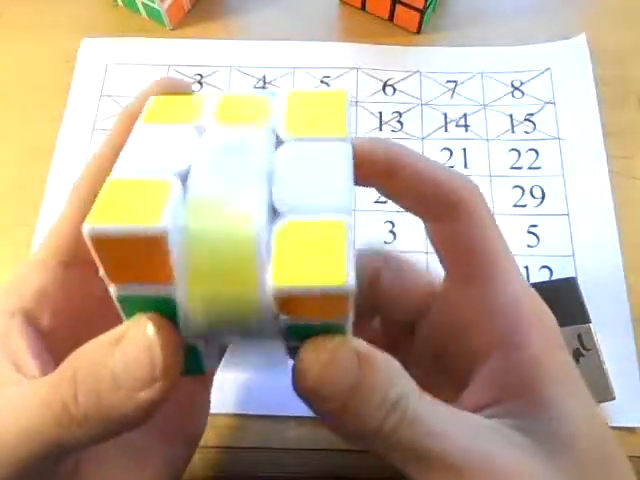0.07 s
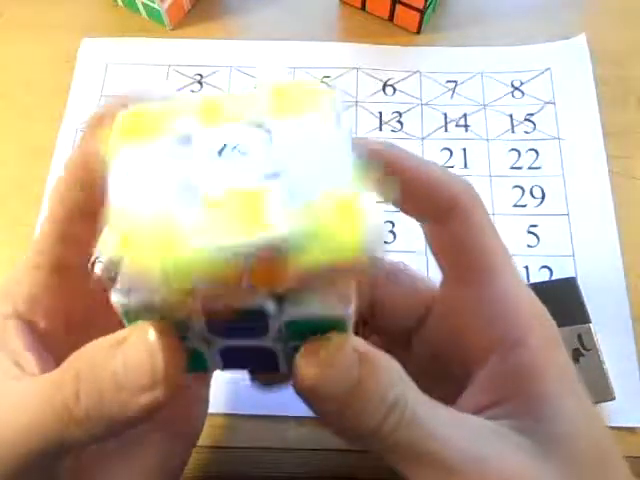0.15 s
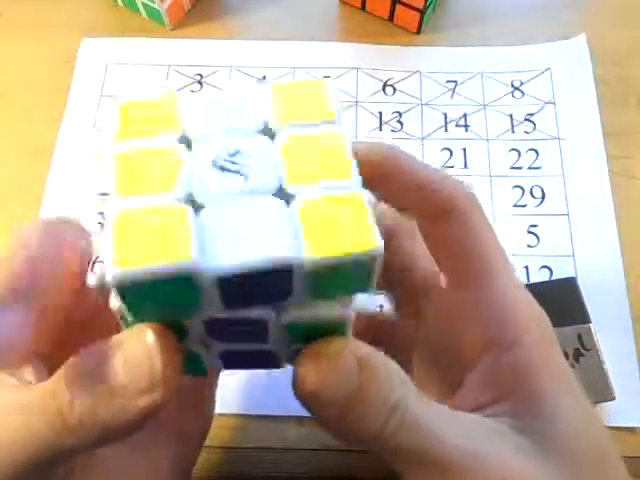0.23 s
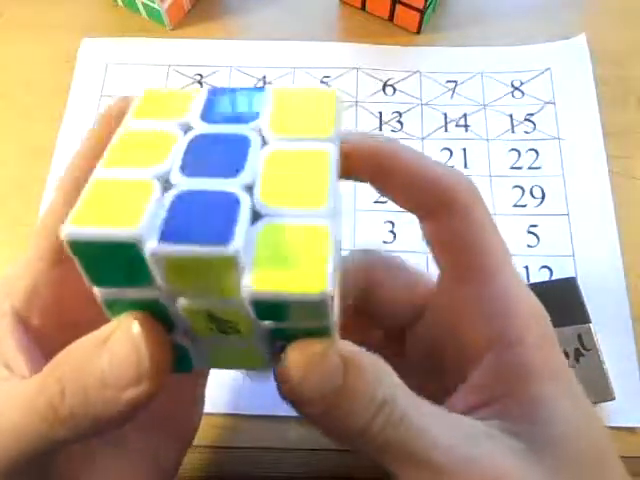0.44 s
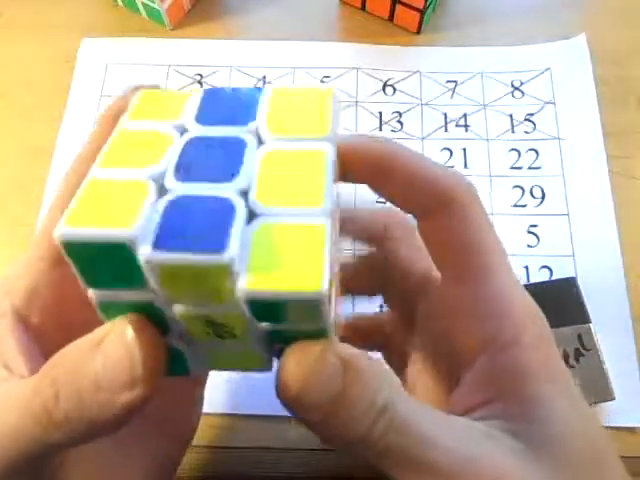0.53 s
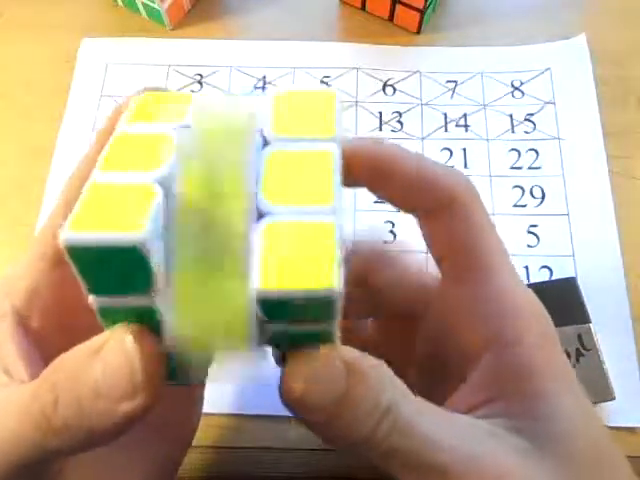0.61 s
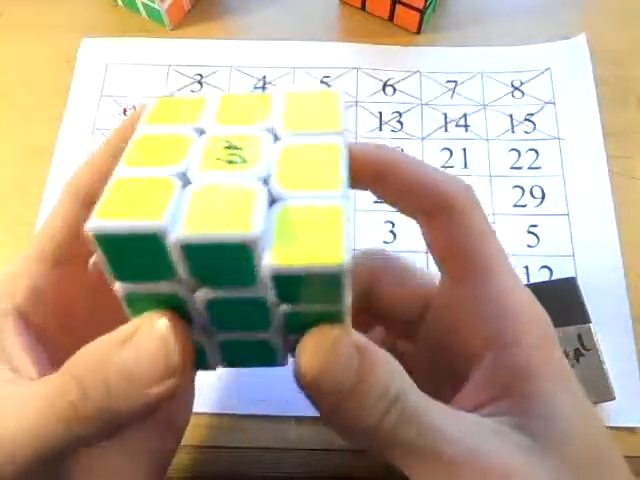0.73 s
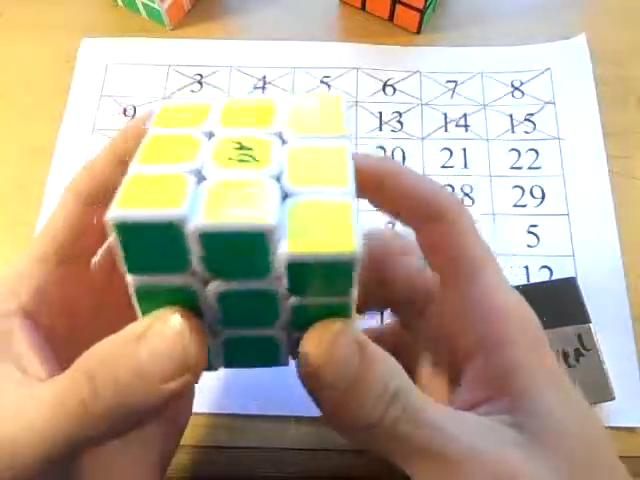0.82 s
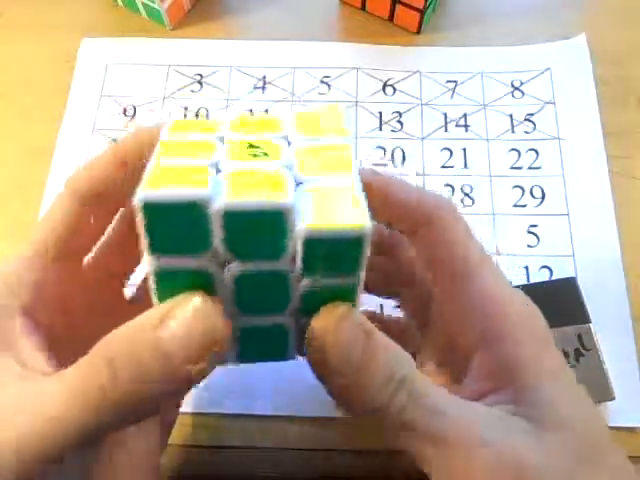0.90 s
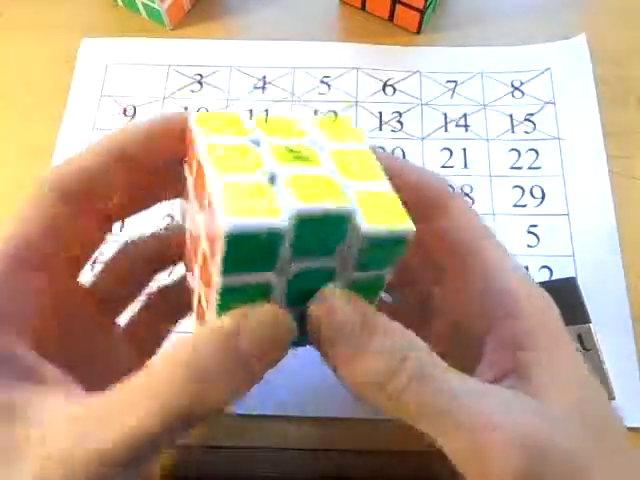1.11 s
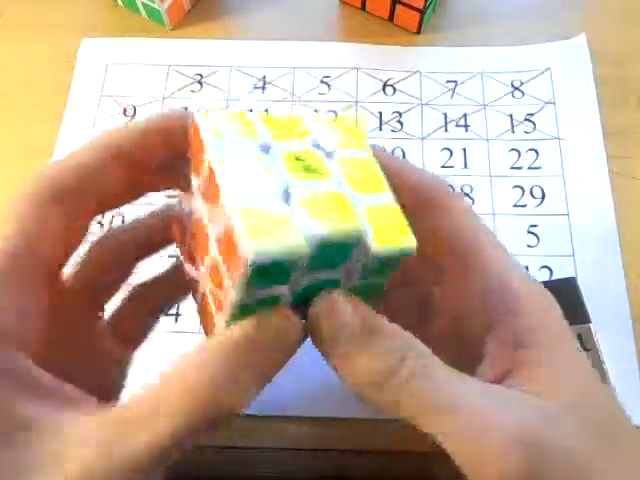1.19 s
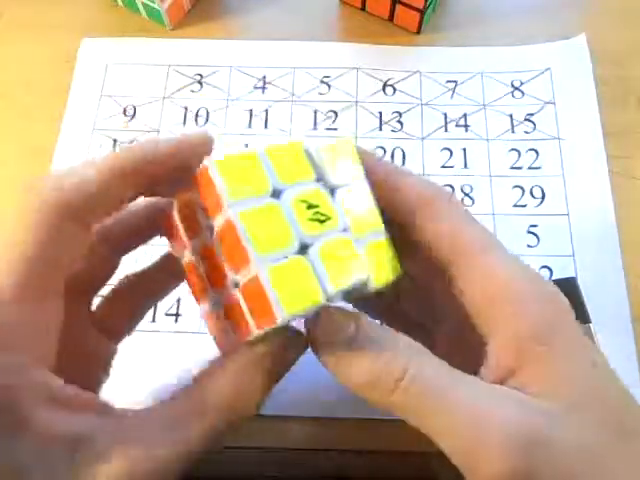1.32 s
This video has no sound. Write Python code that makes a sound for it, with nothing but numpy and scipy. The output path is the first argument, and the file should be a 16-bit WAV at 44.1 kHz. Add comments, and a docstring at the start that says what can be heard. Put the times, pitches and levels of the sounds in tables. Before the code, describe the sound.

Four quick, bright, rattling layer turns of a hollow plastic cube, very close, then small clicks.

```python
"""A plastic puzzle cube is turned fast by hand close to a microphone in a quiet room.
The end of a rattle fades out first, over steady rumble, hiss, a faint hum and two thin whines.
Four layer turns follow: dense contacts ring the hollow pieces and overload the input.
Ticks, and low thumps carried through hands and desk, join the turns; a short room tail follows.
After the last turn, only single ticks and soft thumps remain while the cube is regripped."""
import sys
import numpy as np
from scipy import signal
from scipy.fft import rfft, irfft
from scipy.io import wavfile

SR = 44100
rng = np.random.default_rng(int(sys.argv[2]) if len(sys.argv) > 2 else 0)


def to_wav(sig):
    """Store sig (one row per channel, or 1-D mono) as 16-bit WAV at the path in sys.argv[1].

    Samples outside -1..1 are clipped; the rate is SR.
    """
    pcm = np.clip(np.atleast_2d(sig), -1, 1) * 32767
    pcm = np.round(pcm).astype(np.int16)
    wavfile.write(sys.argv[1], SR, pcm.T)  # frames by channels


N = 59535

# Ways the plastic pieces ring, from low thud to bright top:
# (pitch [Hz], relative level [dB], time to fade by 60 dB [s])
THUD_MODES = [(683, 3.5, 0.0073), (825, -2.5, 0.0078)]
KNOCK_MODES = [(1050, -0.5, 0.0091), (1112, -1.5, 0.017), (1211, -1.5, 0.024), (1312, -7, 0.019),
               (1474, -12, 0.026)]
MIDDLE_MODES = [(2295, -1.1, 0.0052), (2700, -0.72, 0.0051), (3270, -3, 0.0053), (4060, -1.9, 0.0044)]
SHELL_MODES = [(5650, -0.61, 0.0032), (6280, 1.1, 0.0053), (6835, -0.018, 0.0083), (7468, 2.3, 0.0063)]
TOP_MODES = [(8785, -1, 0.0036), (9550, -5.5, 0.0093), (10020, -2.5, 0.0071), (11130, -4, 0.0025),
             (12170, -8, 0.0044), (12900, -9, 0.00087)]


def from_db(db):
    """Turn decibels into a plain multiplier."""
    return 10 ** (np.asarray(db) / 20)


def rms_one(x):
    """Scale a sound so that its average (RMS) level is 1."""
    return x / np.sqrt(np.mean(x ** 2) + 1e-20)


def filtered(x, order, cutoff_hz, kind="low"):
    """Keep the sound below the cutoff, or above it if kind is "high"."""
    return signal.sosfilt(signal.butter(order, cutoff_hz, kind, fs=SR, output="sos"), x)


def shaped_noise(spectrum):
    """Give random noise a chosen strength at each frequency, at RMS level 1."""
    return rms_one(irfft(rfft(rng.standard_normal(N)) * spectrum, N))


def ring(clicks, hz, t60):
    """Each click sets off a fading sine; a unit click starts it at height 1."""
    decay = from_db(-60 / (t60 * SR))  # what is left after one sample
    angle = 2 * np.pi * hz / SR
    feedback = [1, -2 * decay * np.cos(angle), decay * decay]
    return signal.lfilter([0, np.sin(angle)], feedback, clicks + 1e-18)


def strike(clicks, modes, spread_db=3):
    """Every click strikes every mode with a random strength and sign of its own."""
    out = np.zeros(N)
    for hz, db, t60 in modes:
        strength = from_db(db + spread_db * rng.standard_normal(N))
        sign = rng.choice([-1, 1], N)
        out += ring(clicks * strength * sign, hz, t60)
    return out


def turn_gain(column):
    """Follow one level column as pieces slide past each other, fading at both ends of each turn."""
    # The fading end of a rattle, then four turns, each a list of
    # (time [s], rattle level [dB], hollow knock level [dB]), before the low cut in scene()
    turn_levels = [
        [(0, -26, -29), (.014, -37, -39), (.03, -48, -77), (.05, -40, -51)],
        [(.168, -55, -36), (.18, -37, -38.5), (.186, -22, -29.5), (.203, -24.5, -28), (.207, -10.5, -14.5),
         (.214, -14, -18.5), (.23, -9, -16), (.245, -20.5, -24), (.262, -69, -82)],
        [(.285, -56, -41), (.3, -25, -30), (.304, -19, -19.5), (.315, -12, -27.5), (.3235, -22.5, -19),
         (.325, 1.5, -7.5), (.342, -1.5, -21), (.3445, -17, -24.5), (.36, -30, -31)],
        [(.482, -46, -46), (.49, -32, -36), (.499, -17, -27.5), (.503, -15, -15.5), (.518, -4, -14),
         (.528, -13, -30), (.536, -11.5, -20), (.548, -14.5, -34), (.562, -22.5, -33), (.58, -64, -49)],
        [(.726, -47, -42), (.737, -30.5, -24), (.75, -16.5, -25.5), (.764, -10, -16), (.784, -14.5, -26.5),
         (.79, -17.5, -37), (.81, -56, -60)],
    ]
    fade_s = 0.0013
    t = np.arange(N) / SR
    out = np.zeros(N)
    for rows in turn_levels:
        times = np.array(rows)[:, 0]
        levels_db = np.array(rows)[:, column]
        inside_s = np.minimum(t - times[0], times[-1] - t)  # negative outside the turn
        fade = np.clip(1 + inside_s / fade_s, 0, 1)
        out += from_db(np.interp(t, times, levels_db)) * fade
    return out


def rattle():
    """Dense uneven contacts ring the pieces; each also leaves a broad crack."""
    contacts_per_s, contact_spread_db = 4000, 2.5
    middle_db, shell_db, top_db, crack_db = -13.5, -5, -2.5, -24
    thud_db = -14  # compared with the knock
    sizes = from_db(contact_spread_db * np.minimum(rng.exponential(1, N), 4))
    contacts = sizes * (rng.random(N) < contacts_per_s / SR)

    bright = from_db(middle_db) * rms_one(strike(contacts, MIDDLE_MODES))
    bright += from_db(shell_db) * rms_one(strike(contacts, SHELL_MODES))
    bright += from_db(top_db) * rms_one(strike(contacts, TOP_MODES))
    bright += from_db(crack_db) * rms_one(contacts * rng.standard_normal(N))

    hollow = rms_one(strike(contacts, KNOCK_MODES))
    hollow += from_db(thud_db) * rms_one(strike(contacts, THUD_MODES))
    return turn_gain(column=1) * bright + turn_gain(column=2) * hollow


def floor():
    """Room rumble and microphone hiss are shaped noise; hum and whines are very narrow noise."""
    # Tone of the rumble and hiss: (frequency [Hz], relative level per Hz [dB])
    noise_levels = [(15, -23), (25, 0.5), (359, -8), (804, -13.5), (1750, -17), (2120, -16.5), (2850, -19),
                    (6920, -18), (7710, -14.5), (8350, -15), (15500, -25.5)]
    # A low hum and two thin electronic whines:
    # (pitch [Hz], RMS level [dB], distance from the pitch to half height [Hz])
    whine_lines = [(200, -58, 14), (7870, -59, 12), (15735, -61, 12)]
    noise_db = -44.5  # RMS level of rumble and hiss together
    grid = np.fft.rfftfreq(N, 1 / SR) + 1  # 1 Hz added so the logarithm exists at zero
    hz, db = np.transpose(noise_levels)
    spectrum = from_db(np.interp(np.log(grid), np.log(hz), db))
    out = from_db(noise_db) * shaped_noise(spectrum)
    for line_hz, level_db, width_hz in whine_lines:
        peak = 1 / (1 + ((grid - line_hz) / width_hz) ** 2)
        out += from_db(level_db) * shaped_noise(peak)
    return out


def room(x):
    """Desk and walls return a short, slightly dull tail, made of fading noise."""
    t60_s, level_db, cutoff_hz, delay_s = 0.16, -17, 8000, 0.0052
    t = np.arange(SR // 2) / SR
    tail = rng.standard_normal(len(t)) * from_db(-60 * t / t60_s) * (t > delay_s)
    tail = filtered(tail, 2, cutoff_hz)
    tail /= np.sqrt(np.sum(tail ** 2))  # total energy 1
    return from_db(level_db) * signal.fftconvolve(x, tail)[:N]


def ticks():
    """Each tick is a short swell of contacts that strikes five groups of modes in its own mix."""
    # Single ticks, snaps and scuffs: (time [s], strength [dB], thud [dB], knock [dB],
    # middle [dB], top [dB], rise time [ms]); the four colours are relative,
    # and the group levels below are added to them
    tick_rows = [ (0.048, -29.5, -6, -5.5, 5, 0.5, 3.9), (0.0704, -19, -18, -2, -7.5, -1, 2.3),
                 (0.1633, -22, -13, -7, -5, -14, 0.52), (0.189, -20, -10, -24, -4, 3, 0.27),
                 (0.2135, 4, -24, -22, -35, -6.5, 1.6), (0.2243, 1.5, -39, -0.5, -5.5, -5, 0.76),
                 (0.23, -1, -29, -6.5, -18, -5, 0.35), (0.2807, -22.5, -16, -3, 0, -4, 1.2),
                 (0.29, -16, -25, -6, -1, -10, 1.3), (0.303, -11.5, -2, -19, -5, -13, 1.1),
                 (0.32, 3, -43, -30, -20, -6.5, 0.46), (0.3379, -3, -13, -1, -16, -18, 0.67),
                 (0.4775, -21, -17, 1, -2, -15, 0.72), (0.4848, -13, -28, -1, -2, -7, 0.6),
                 (0.49, -8.5, -32, -24, -16, -15, 0.49), (0.5006, -10, -44, -29, -2.5, -12, 1.1),
                 (0.514, 3, -43, 2.5, -7.5, -5, 3.1), (0.5229, 0.5, -27, -15, -33, 3.5, 1.07),
                 (0.531, -1, -23, 4.5, -8, -7, 1.6), (0.5354, -9, -28, 6.5, -14, -12, 1.4),
                 (0.5435, -4, -28, 0.5, 0, -10, 1.1), (0.5608, -18, -24, 4, -1, 1, 0.44),
                 (0.6421, -18, -28, -2.5, -2.5, -6.5, 1.24), (0.729, -13, -15, -10, -6.5, -7.5, 0.94),
                 (0.74, -12, -28, -5, -17, -8, 0.35), (0.76, 3, -33, -16, -8, 0.5, 1.4),
                 (0.7658, -1.5, -34, -2, -24, 0.5, 0.41), (0.775, 3, -21, -2.5, -3, -2, 0.61),
                 (0.7817, -6, -8, -5, -2, 1.5, 1.3), (0.8765, -28.5, -10, 7, 1, -1, 0.6),
                 (0.913, -30, 3, 7, -5, -8, 0.6), (1.0932, -28, -11, -4.5, -6.5, -8.5, 0.43),
                 (1.0998, -31, -21, 3.5, -6.5, -8, 0.92), (1.1431, -35, -28, -5, -21, -2, 0.65),
                 (1.166, -31.5, -25, 0, 2.5, -1, 0.91), (1.2142, -22.5, -39, -42, -20, -10, 0.43),
                 (1.2274, -24, -29, -38, -28, -4.5, 0.34), (1.2305, -29, -25, -35, -30, -5, 1.8),
                 (1.267, -26, -4.5, -5, 1, -4, 0.68), (1.2799, -18, -24, -17, -3.5, -10, 0.23),
                 (1.298, -26, -9, -14, 8, 4, 3.4), (1.3096, -24, 10.5, -29, 9.5, -13, 0.35),
                 (1.3454, -32, 0, 6.5, 5, -20, 0.63)]
    shell_db, thud_db, knock_db, middle_db, top_db = -7.5, -0.5, -6.5, -7.5, 0
    contacts_per_s, spread_db = 12000, 1
    contacts = rng.random(N + SR) < contacts_per_s / SR
    force = np.zeros((5, N + SR))  # one row of contacts for each group
    t = np.arange(SR // 20) / SR
    for start_s, strength_db, thud, knock, middle, top, rise_ms in tick_rows:
        start = int(start_s * SR)
        span = slice(start, start + len(t))
        u = t / (rise_ms / 1000)
        swell = u * np.exp(1 - u) * contacts[span]  # highest at u = 1
        swell = swell / np.sqrt(np.sum(swell ** 2) + 1e-9)
        mix_db = np.array([shell_db, thud + thud_db, knock + knock_db, middle + middle_db, top + top_db])
        force[:, span] += from_db(strength_db + mix_db)[:, None] * swell
    groups = SHELL_MODES, THUD_MODES, KNOCK_MODES, MIDDLE_MODES, TOP_MODES
    return sum(strike(f[:N], modes, spread_db) for f, modes in zip(force, groups))


def thumps():
    """A soft push through hands and desk sets one low mode ringing."""
    # (time [s], level before softening [dB], pitch [Hz], time to fade by 60 dB [s])
    thump_rows = [(0.209, -37.5, 166, 0.12), (0.323, -16, 141, 0.051), (0.335, -29, 139, 0.02),
                  (1.24, -36.5, 38, 0.24), (1.345, -28, 268, 0.031)]
    out = np.zeros(N)
    for start_s, db, hz, t60 in thump_rows:
        click = np.arange(N) == int(start_s * SR)
        out += ring(from_db(db) * click, hz, t60)
    return filtered(out, 2, 305)  # soften above 305 Hz


def scene():
    """The small cube radiates little low sound; its room tail, thumps and noise floor join it."""
    small_body_hz = 880
    cube = filtered(rattle() + ticks(), 3, small_body_hz, "high")
    return (cube + room(cube) + thumps() + floor())[None]


def record(dry):
    """The input clips hard, sits slightly off centre, and the top is cut steeply."""
    overload, offset, cutoff_hz = 1.0, -0.0037, 15820
    clipped = np.clip(dry, -overload, overload) + offset
    # 0.5 dB of ripple below the cutoff, at least 70 dB less in the cut top
    top_cut = signal.ellip(12, 0.5, 70, cutoff_hz, fs=SR, output="sos")
    return np.clip(signal.sosfilt(top_cut, clipped), -1, 1)


dry = scene()
out = record(dry)
to_wav(out)
```